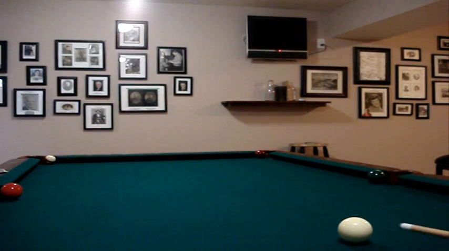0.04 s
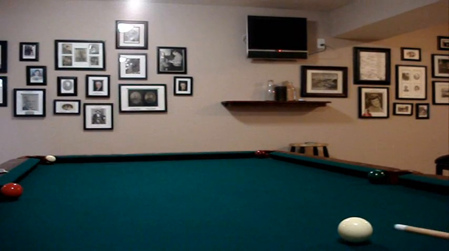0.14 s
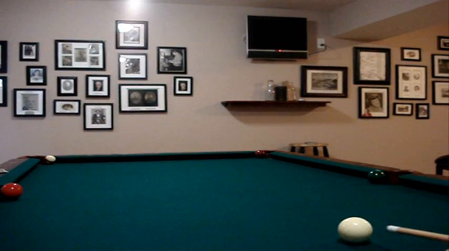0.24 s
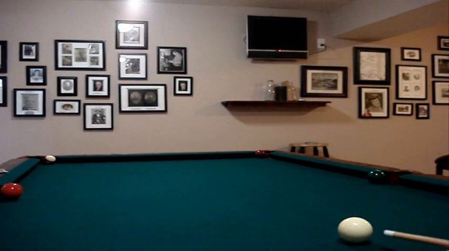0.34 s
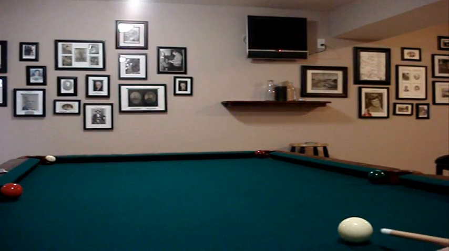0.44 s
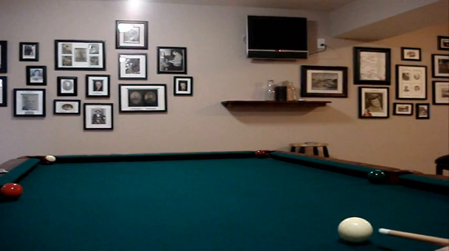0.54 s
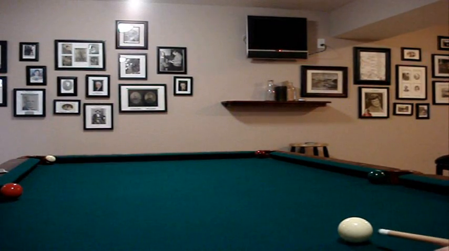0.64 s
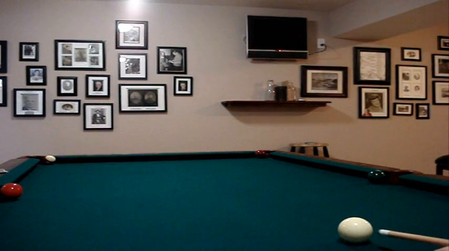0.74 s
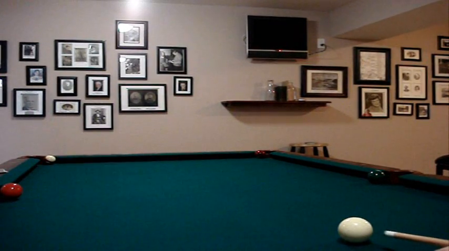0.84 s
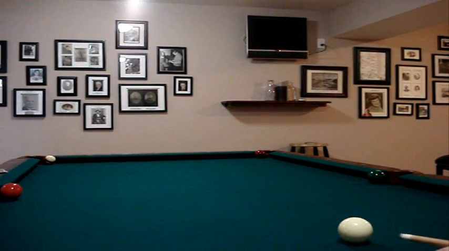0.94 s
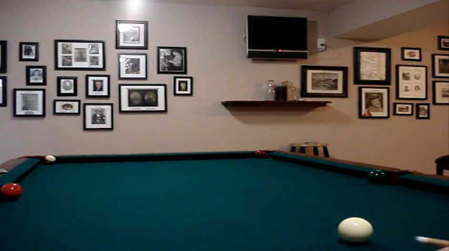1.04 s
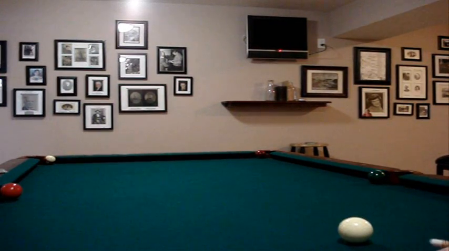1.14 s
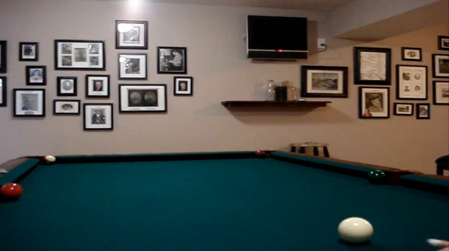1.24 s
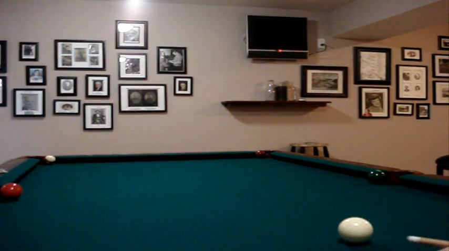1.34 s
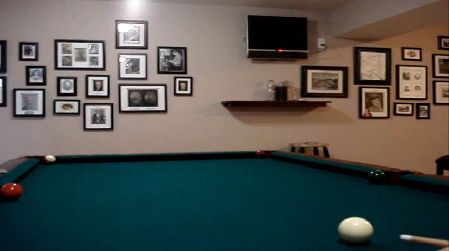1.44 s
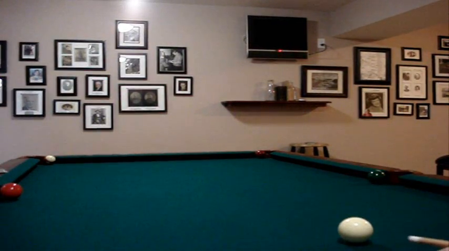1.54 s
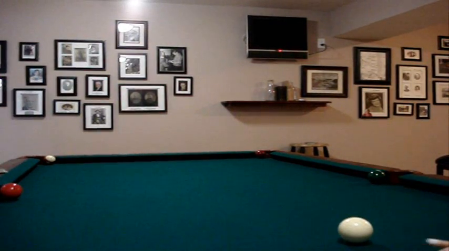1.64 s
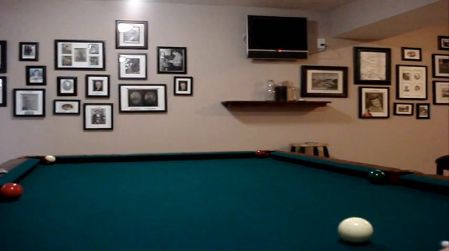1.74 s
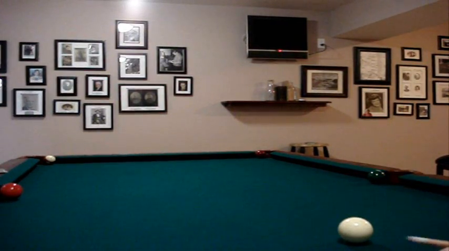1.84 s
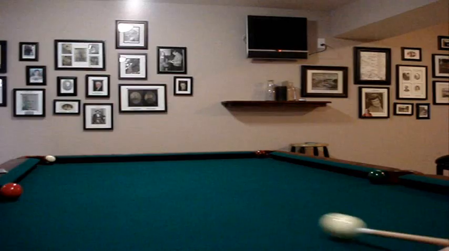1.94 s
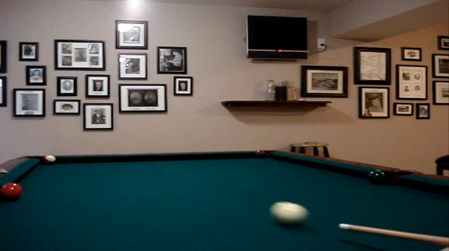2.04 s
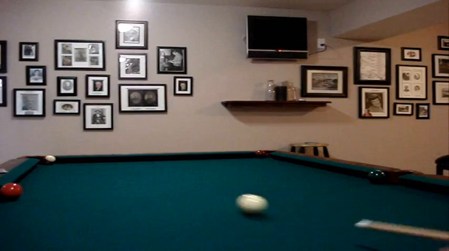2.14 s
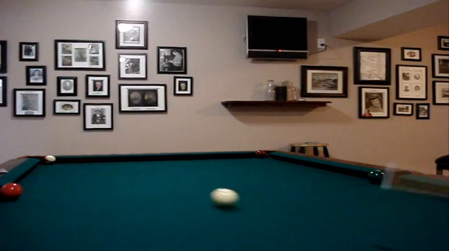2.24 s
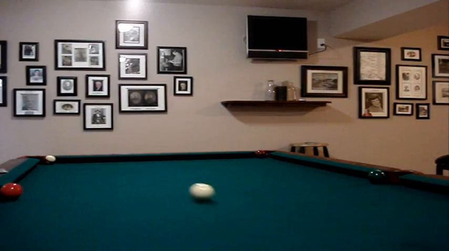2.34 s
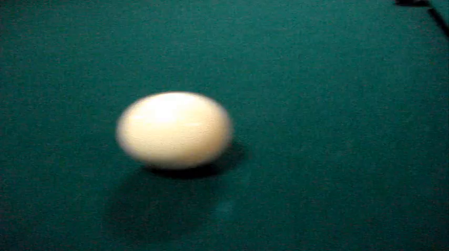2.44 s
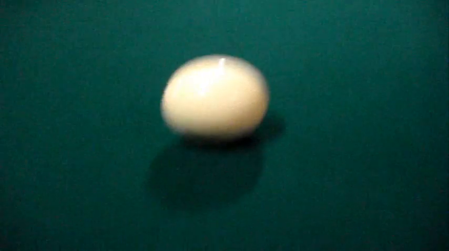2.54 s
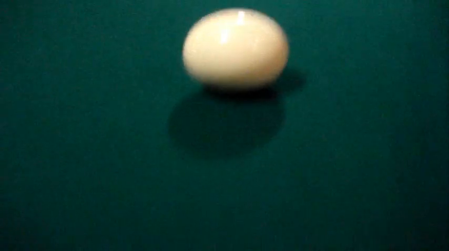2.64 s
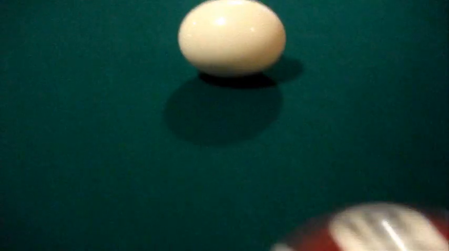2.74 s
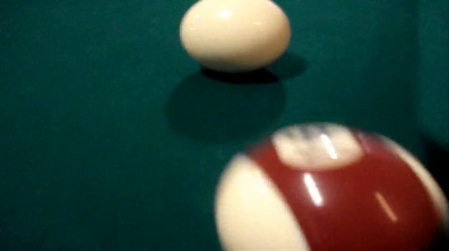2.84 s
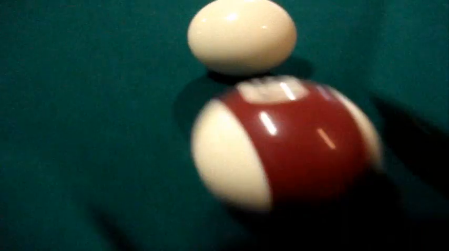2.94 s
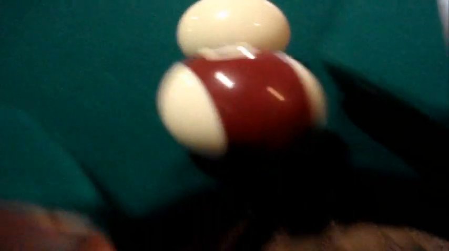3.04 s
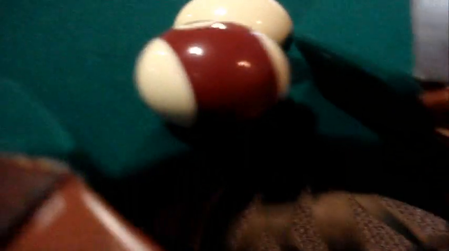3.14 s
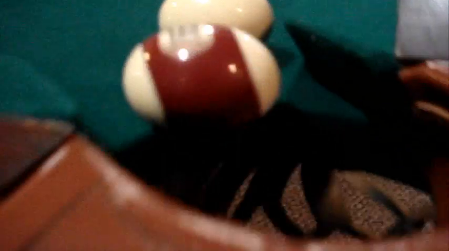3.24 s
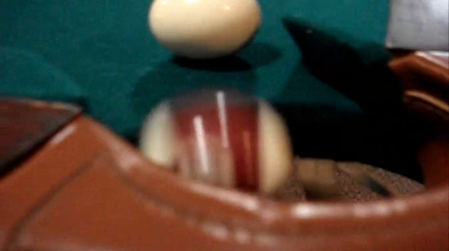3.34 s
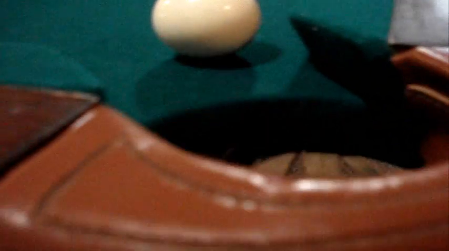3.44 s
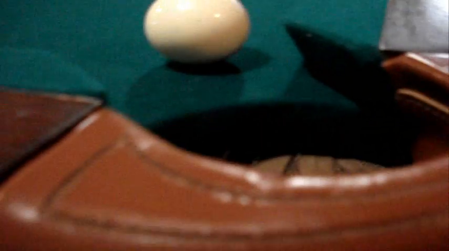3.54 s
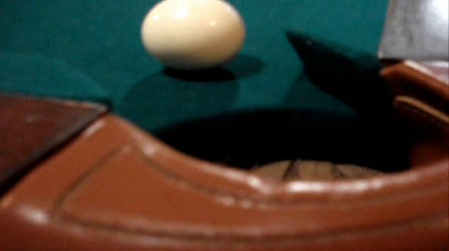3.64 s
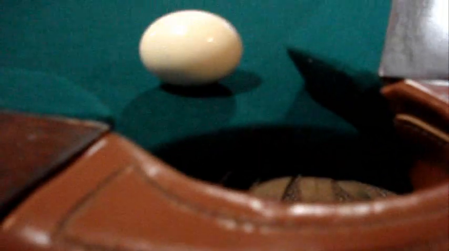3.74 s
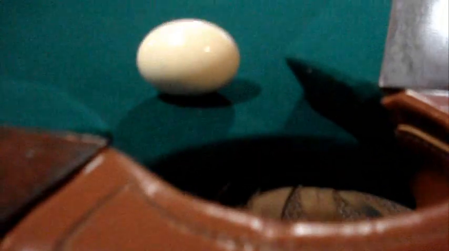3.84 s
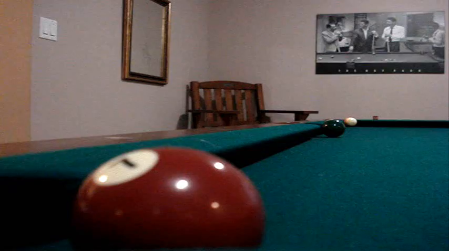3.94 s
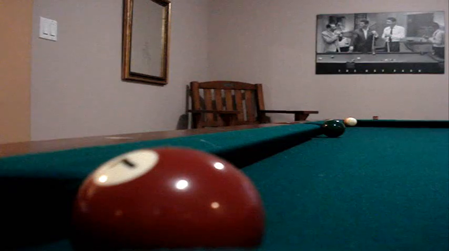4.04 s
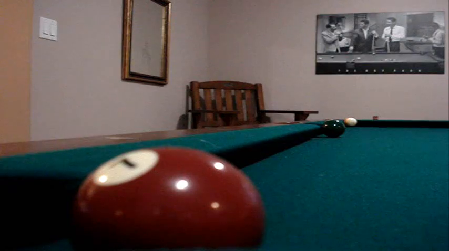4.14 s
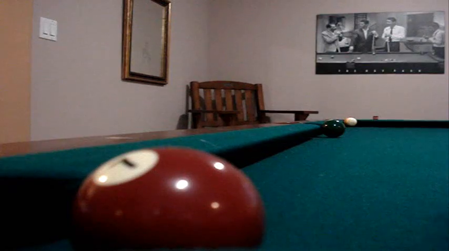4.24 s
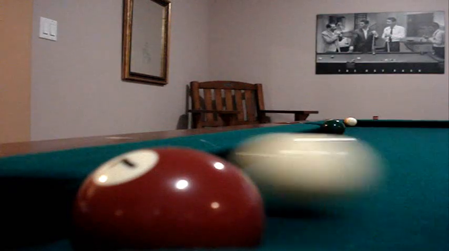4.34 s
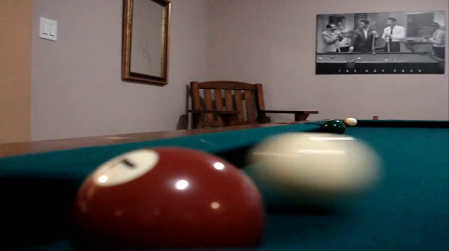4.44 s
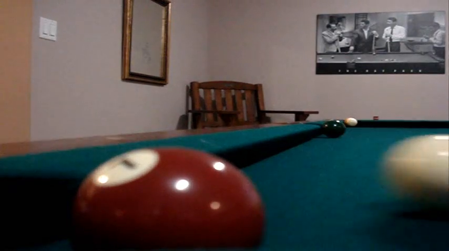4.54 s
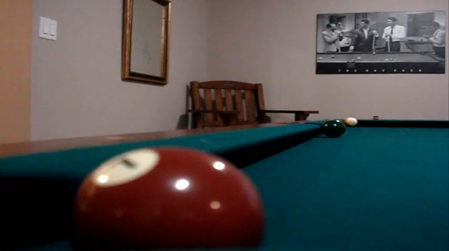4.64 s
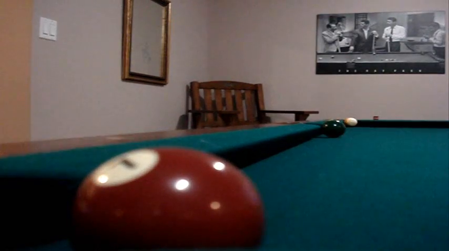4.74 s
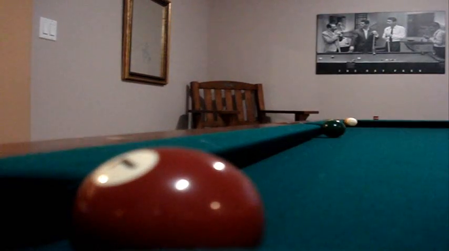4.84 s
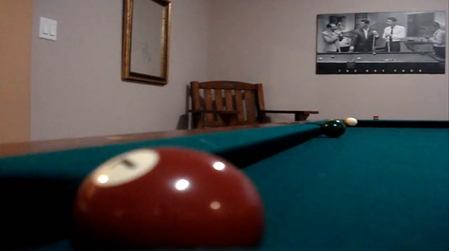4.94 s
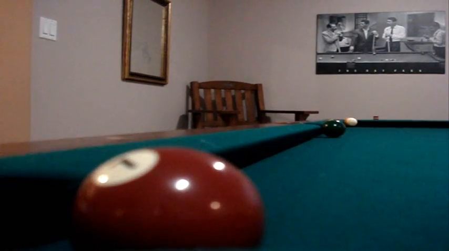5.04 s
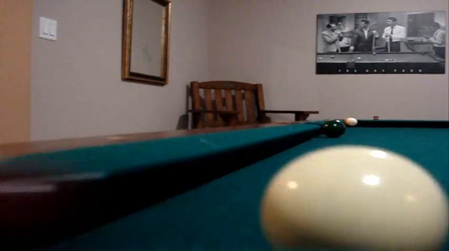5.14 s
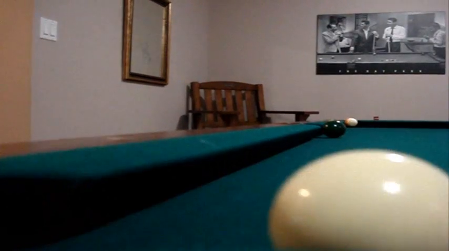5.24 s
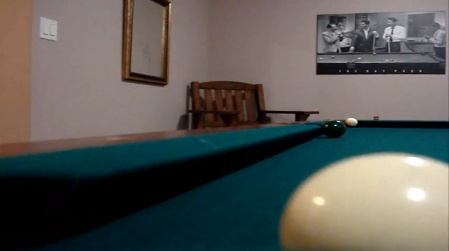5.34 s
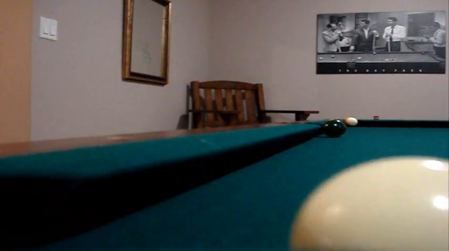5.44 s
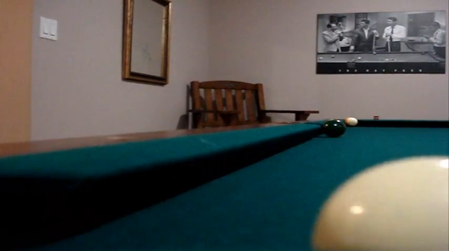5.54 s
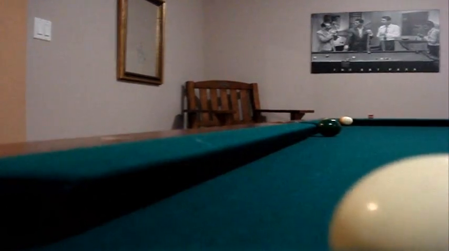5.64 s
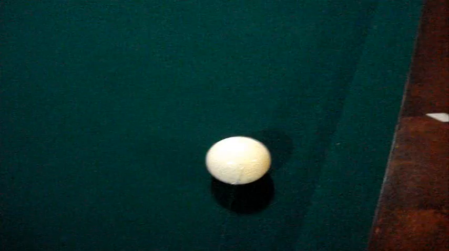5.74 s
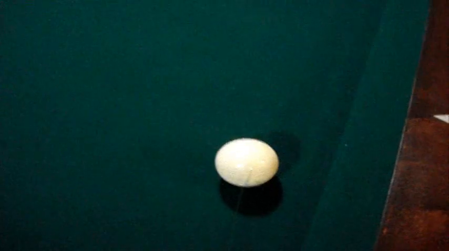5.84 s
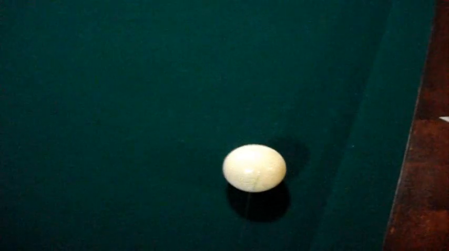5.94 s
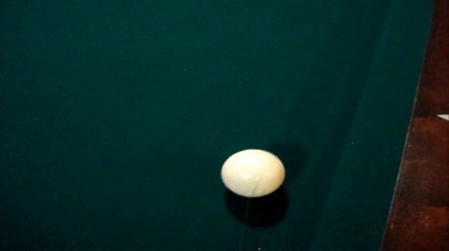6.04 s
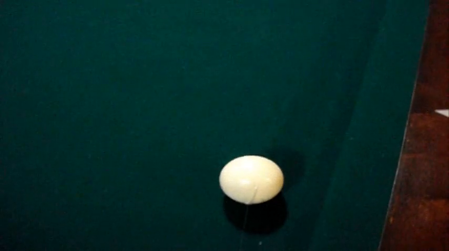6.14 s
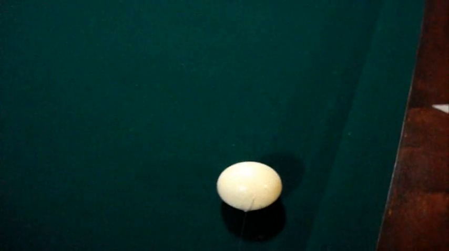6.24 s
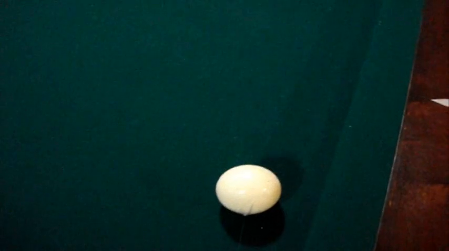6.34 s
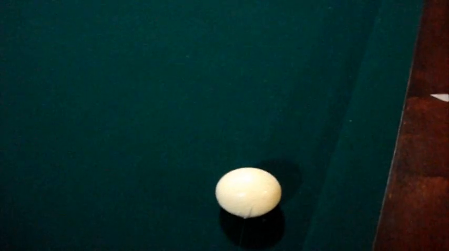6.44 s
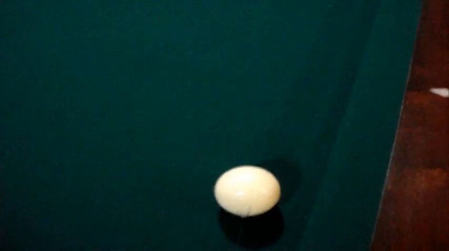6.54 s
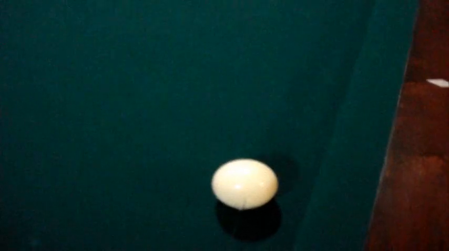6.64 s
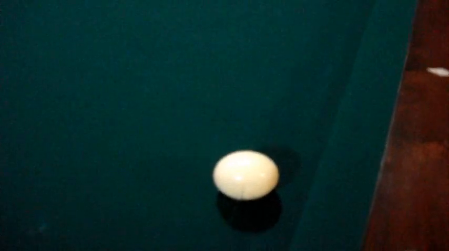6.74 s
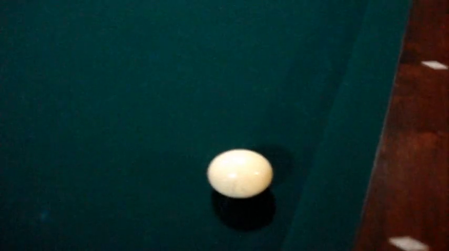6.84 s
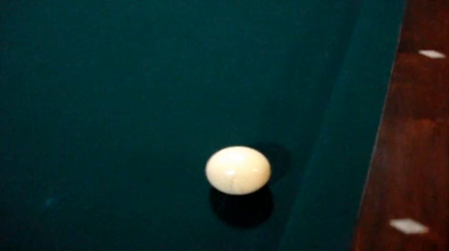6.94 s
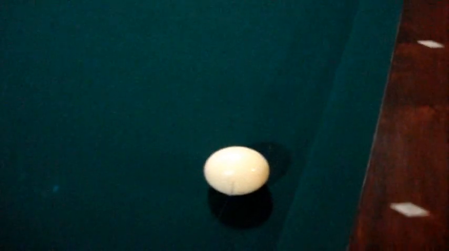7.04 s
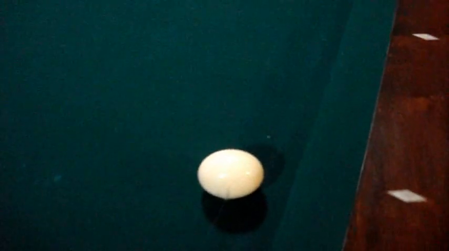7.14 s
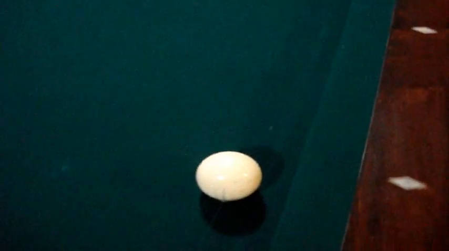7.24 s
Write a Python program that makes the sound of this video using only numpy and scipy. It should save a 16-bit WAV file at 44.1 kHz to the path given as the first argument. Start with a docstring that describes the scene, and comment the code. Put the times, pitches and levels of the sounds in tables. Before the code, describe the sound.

A cue strikes a pool ball, balls roll, clack and knock into a pocket, then break loudly in a small humming room.

```python
"""Pool table, close up

In a small, humming room a cue whispers over the hand and strikes the white ball. Balls roll, thud into
cushions, clack, chatter and knock in a pocket, each blow a brief force that sets a body ringing.
A hard break overloads the microphone, and the camera's case clicks and creaks as it is handled.
At last a spinning ball hisses on the cloth, its rub sinking in pitch as it slows."""
import sys
import numpy as np
from scipy import signal
from scipy.fft import rfft, irfft
from scipy.io import wavfile
from scipy.ndimage import uniform_filter1d, minimum_filter1d

SR = 44100
rng = np.random.default_rng(int(sys.argv[2]) if len(sys.argv) > 2 else 0)


def generate_wav(signal):
    """Clip the signal to [-1, 1] and save it as 16-bit WAV at the path in sys.argv[1]."""
    frames = np.transpose(np.atleast_2d(signal))
    scaled = np.clip(frames, -1, 1) * 32767
    pcm = np.round(scaled).astype(np.int16)
    wavfile.write(sys.argv[1], SR, pcm)


N = 321930
TIME = np.arange(N) / SR

# The colour of the room tone. Each row: frequency in Hz, level in dB.
AIR_COLOUR = [(20, -30), (40, -8.5), (75, -6.5), (110, -3), (170, -1.5), (300, 1), (600, -2.5), (1000, -6),
              (2000, -10), (4000, -14), (8000, -19.5), (9700, -23.5), (10500, -35.5), (15500, -32)]
# Mains hum. Each row: start in seconds, end in seconds, level in dB.
HUM_SPELLS = [(0, 2.6, -64.5), (2.5, 3.55, -57.5)]
# The cue slides over the bridge hand. Each row: start in seconds, end in seconds, level in dB.
PRACTICE_STROKES = [(.205, .22, -52.5), (1.39, 1.46, -60)]
# Cue tip on the white ball, and a ball in the pocket.
# Each row: start in seconds, level in dB, contact time in ms, room send in dB.
CUE_HITS = [(2.0485, -4.5, 0.727, 0.5)]
POCKET_HITS = [(3.5509, 3, 0.16, -3.5), (3.5827, -6.5, 0.26, 2.5), (3.7571, -29, 0.99, 9)]
# How cue, table, ball and pocket (hollow and rim) ring. Each row: pitch in Hz, width in Hz, gain in dB.
CUE_MODES = [(147, 17, 13), (211, 45, 13), (350, 160, 7.5), (520, 230, 7), (760, 88, 0), (960, 170, 0),
             (1760, 46, 9.5), (2220, 174, 16), (3140, 1900, 0), (5000, 6200, -7)]
TABLE_MODES = [(53.8, 22, -2.5), (168, 265, -0.5), (371, 110, -4), (498, 144, -1.5), (596, 10, -0.5),
               (790, 400, -3.5), (1190, 540, 7)]
BALL_MODES = [(252, 160, -11), (800, 200, -4.5), (1260, 630, -7.5), (1907, 870, 3), (2660, 3500, -17),
              (3600, 430, -20), (6000, 5400, -10)]
POCKET_MODES = [(740, 41, 9), (1620, 150, 13), (2960, 300, -4), (3480, 300, 11)]
# Early reflections off the table and the walls. Each row: delay in seconds, linear gain.
TABLE_REFLECTIONS = [(.0011, 0.19), (.0017, 0.27)]
WALL_REFLECTIONS = [(0.0126, 0.3), (0.0206, 0.16), (.0232, 0.2), (0.026, 0.053)]
# The length of the room's tail. Each row: frequency in Hz, time to fall 60 dB in seconds.
TAIL_DECAY = [(100, 0.67), (300, 0.33), (1000, 0.45), (2000, 0.34), (4000, 0.33), (12000, 0.13)]
# The colour of that tail. Each row: frequency in Hz, level in dB.
TAIL_COLOUR = [(40, -12), (150, -2), (500, -1), (1100, 2), (2000, -1.5), (3200, 2.5), (6000, -2),
               (15000, 6)]
# Balls roll over the slate. Each row: start in seconds, end in seconds, level in dB.
ROLL_SPELLS = [(2.08, 2.2, -47), (2.53, 2.6, -44.5), (3.3, 4.45, -55), (4.5, 5.2, -49.5)]
# The colour of their rumble. Each row: frequency in Hz, level in dB.
RUMBLE_COLOUR = [(50, -19), (100, 3), (160, 0.5), (300, -4.5), (600, -14), (1500, -19), (4000, -40)]
# Ball on cushion or slate, and ball on ball; the nearer the hit, the less room.
# Each row: start in seconds, level in dB, room send in dB.
CUSHION_HITS = [(2.0900, -30.5, 8), (4.5025, -24, 2), (4.5140, -24, 3), (5.2400, -12.5, 3.5),
                (5.2845, 1, 7.5), (5.3110, -8, 5), (5.3360, -8, 9.5), (5.3687, -10.5, 0.5)]
BALL_HITS = [(3.2686, 4, -6.5), (3.5426, 8, 5), (3.564, 9.5, -21), (3.6386, -2.5, -6.5),
             (5.042, -29.5, -12), (5.2367, 9, 8.5), (5.2868, 9, -4), (5.3117, 5, -11), (5.3686, -5, -15),
             (5.3874, 13, -10), (5.4069, 10, -13), (5.4334, -4.5, 0.5)]
# Handling clicks in the camera's case.
# Each row: start in seconds, level in dB, ring pitch in Hz, ring trim in dB, low bump trim in dB.
HANDLING_CLICKS = [(2.7703, -24, 2570, -18, -30), (3.86, -19, 2590, -5, -30), (3.8959, -12, 3430, -4, -3.5),
                   (3.9326, -8, 2310, 4, -9), (3.9698, -15.5, 2680, -6, -2), (4.1937, -33.5, 3660, 7, -30),
                   (5.696, -11.5, 2630, 0.5, -28), (5.6995, -14, 2610, 10, -22),
                   (5.7282, -25, 3420, -9, -28), (5.7759, -12, 2470, 2.5, -31),
                   (5.7905, -13.5, 2460, 1, -16), (5.8320, -17, 2400, 5, -28)]
# How the case rings. Each row: multiple of the ring pitch, width in Hz, gain in dB.
CASE_MODES = [(1, 125, 9.5), (1.35, 300, -17), (1.7, 370.4, -8)]
# The colour of its snap. Each row: frequency in Hz, level in dB.
SNAP_COLOUR = [(200, -14), (900, -1.5), (1600, 0.5), (3000, 4), (5000, -3), (8000, -6.5), (11000, -27.5),
               (15500, -14.5)]
# A quick, fading clatter of balls, at the pocket and in the break. Each row: start in seconds, length in
# seconds, opening level in dB, fade in dB per second, contact time at that level in ms, room send in dB.
BALL_FLURRIES = [(3.542, 0.062, 0, 135, 0.25, -4.5), (5.246, .22, 2, 94, .37, 1)]
# Two balls bounce against each other. Each row: start in seconds, first gap in seconds,
# final gap in seconds, opening level in dB, time to fall 10 dB in seconds.
CHATTER_RUNS = [(3.6838, .0152, 0.012, -9.5, 0.032), (3.748, .0052, .0025, -13.5, 0.041)]
# The case creaks between clicks. Each row: start in seconds, length in seconds, level in dB.
CASE_CREAKS = [(3.876, .026, -26), (5.739, .008, -26), (5.767, .018, -19), (5.798, .034, -41)]
# The colour of the spinning ball's hiss, with the recorder's faint treble fizz above 10 kHz.
# Each row: frequency in Hz, level in dB.
SPIN_HISS_COLOUR = [(1060, -18), (1800, -1), (2510, -4.5), (2720, -1.5), (3200, -3), (3570, -6), (4940, 1),
                    (5700, -10), (6180, -8.5), (8550, -27), (10700, -27), (11600, -27), (13400, -32),
                    (15500, -21)]
# The sample clock wobbles. Each row: rate in Hz, depth in samples.
CLOCK_JITTER = [(8000, 0.22), (12000, 0.44)]

CLACK_SOFTENING = 0.13  # contact time lengthens as this power of the falling force


def from_db(db):
    """Decibels to gain."""
    return 10 ** (np.asarray(db) / 20)


def rms_one(x):
    """Scale to rms 1."""
    return x / np.sqrt(np.mean(np.abs(x) ** 2) + 1e-20)


def at_hz(points, hz):
    """Read a table on a log-frequency axis."""
    f, value = np.transpose(points)
    return np.interp(np.log(np.maximum(hz, 1)), np.log(f), value)


def filtered(x, hz, kind="low", order=2):
    """A Butterworth filter."""
    return signal.sosfilt(signal.butter(order, hz, kind, fs=SR, output="sos"), x)


def noise(colour, size=N):
    """Noise of a given colour, rms 1."""
    gain = from_db(at_hz(colour, np.fft.rfftfreq(size, 1 / SR)))
    return rms_one(irfft(rfft(rng.standard_normal(size)) * gain, size))


def slow_noise(hz):
    """A random drift, rolled off above hz, rms 1."""
    return rms_one(filtered(rng.standard_normal(N), hz))


def add(out, s, sound):
    """Mix a sound in at s seconds."""
    i = int(round(s * SR))
    out[i:i + len(sound)] += sound[:len(out) - i]


def spells(rows, attack_s, release_s):
    """The envelope of sounds that fade in, hold and die away."""
    envelope = 0
    for start, end, db in rows:
        attack = np.clip((TIME - start) / attack_s, 0, 1)
        release = np.exp(-np.maximum(TIME - end, 0) / release_s)
        envelope += from_db(db) * attack * release
    return envelope


def scattered(length_s, per_s, spread_db, count=64):
    """Unevenly spaced moments, each with a random level offset in dB."""
    moments = (np.arange(count) + rng.uniform(0, .8, count)) / per_s
    offsets_db = spread_db * rng.standard_normal(count)
    return [(s, db) for s, db in zip(moments, offsets_db) if s < length_s]


def resonate(x, modes):
    """Ring a bank of parallel resonators."""
    out = 0
    for hz, width, db in modes:
        r = np.exp(-np.pi * width / SR)
        poles = [1, -2 * r * np.cos(2 * np.pi * hz / SR), r * r]
        out += from_db(db) * (1 - r * r) / 2 * signal.lfilter([1, 0, -1], poles, x)
    return out


def blow(contact_ms, modes, smoothing=2.04, size=4400):
    """An elastic contact: force swells and falls, and its rate of change rings the body; peak 1."""
    contact_s = contact_ms / 1000
    phase = np.minimum(np.arange(size) / (SR * contact_s), 1)
    force = np.abs(np.sin(np.pi * phase)) ** 1.5
    force = filtered(force, min(smoothing / contact_s, SR / 3))  # losses round its corners
    sound = resonate(np.diff(force, prepend=0), modes)
    return sound / np.abs(sound).max()


def blows(rows, modes):
    """Blows on one body, as two buses: the direct sound and the room send."""
    direct, send = np.zeros(N), np.zeros(N)
    for s, db, contact_ms, send_db in rows:
        sound = from_db(db) * blow(contact_ms, modes)
        add(direct, s, sound)
        add(send, s, from_db(send_db) * sound)
    return np.array([direct, send])


def elastic(rows, full_ms, softening):
    """Add contact times: full_ms for a blow reaching the room at 0 dB, longer and duller if weaker."""
    return [(s, db, full_ms * from_db(-softening * (db + send_db)), send_db) for s, db, send_db in rows]


def room_tone(air_db=-50.5, hum_hz=124):
    """A bed of steady air, with mains hum under the first half."""
    hum = rms_one(np.sin(2 * np.pi * hum_hz * TIME))
    return from_db(air_db) * noise(AIR_COLOUR) + spells(HUM_SPELLS, attack_s=0.19, release_s=.15) * hum


def cue_slides(centre_hz=5500, width_hz=3500):
    """The shaft whispers over the hand during the practice strokes."""
    rustle = rms_one(resonate(noise(AIR_COLOUR), [(centre_hz, width_hz, 0)]))
    return spells(PRACTICE_STROKES, attack_s=0.011, release_s=0.011) * rustle


def cue_strike():
    """The tip meets the white ball and the cue rings."""
    return blows(CUE_HITS, CUE_MODES)


def echoes(x, paths):
    """Delayed copies off hard surfaces."""
    out = np.zeros(N)
    for delay_s, gain in paths:
        add(out, delay_s, gain * x)
    return out


def room(send, build_s=0.00033, tail_db=-1.0, size=32768):
    """A few wall echoes and a diffuse tail that dies sooner in the treble."""
    t, hz = np.arange(size) / SR, np.fft.rfftfreq(size, 1 / SR)
    white, tail = rfft(rng.standard_normal(size)), 0
    build = 1 - np.exp(-t / build_s)
    edges_hz = np.geomspace(30, 18000, 20)
    for low, high in zip(edges_hz, edges_hz[1:]):
        centre = np.sqrt(low * high)
        decay = from_db(-60 * t / at_hz(TAIL_DECAY, centre))
        band = irfft(white * (hz >= low) * (hz < high)) * decay * build
        share = np.sqrt(2 * (high - low) / SR / size)  # energy in proportion to the band's width
        tail += share * from_db(at_hz(TAIL_COLOUR, centre)) * rms_one(band)
    return from_db(tail_db) * signal.fftconvolve(send, tail)[:N] + echoes(send, WALL_REFLECTIONS)


def rolling(lumps_db=1.5, lumps_hz=14):
    """Rolling balls make the slate rumble unevenly."""
    lumps = from_db(lumps_db * slow_noise(lumps_hz))
    return spells(ROLL_SPELLS, attack_s=0.066, release_s=0.066) * lumps * noise(RUMBLE_COLOUR)


def thuds():
    """A ball meets cushion or slate, and the table answers with a dull knock."""
    return blows(elastic(CUSHION_HITS, full_ms=1.17, softening=0.33), TABLE_MODES)


def case_clicks(rows, snap_s=0.0033, ring_db=-3.5, bump_hz=26, bump_s=0.012, damped_s=0.022, size=4096):
    """Dry snaps that ring briefly in the plastic and shove the microphone."""
    out, t = np.zeros(N), np.arange(size) / SR
    bump = np.cos(2 * np.pi * bump_hz * t) * np.exp(-t / bump_s) / 2
    damping = np.exp(-(t / damped_s) ** 2)  # the hand stops the ringing
    for s, db, ring_hz, ring_trim_db, bump_trim_db in rows:
        snap = noise(SNAP_COLOUR, size) * np.exp(-t / snap_s) / 2
        modes = [(ratio * ring_hz, width, gain_db) for ratio, width, gain_db in CASE_MODES]
        ring = resonate(signal.unit_impulse(size), modes)
        ring = from_db(ring_db + ring_trim_db) * ring / np.abs(ring).max()
        add(out, s, from_db(db) * (damping * (snap + ring) + from_db(bump_trim_db) * bump))
    return out


def clacks(shove_db=-19, shove_ms=2.23, shove_send_db=-12.5):
    """Ball strikes ball with a bright crack, and a softer shove into the table adds body."""
    cracks = elastic(BALL_HITS, full_ms=.42, softening=CLACK_SOFTENING)
    shoves = [(s, db + shove_db, shove_ms, shove_send_db) for s, db, _ in BALL_HITS]
    return blows(cracks, BALL_MODES) + blows(shoves, TABLE_MODES)


def flurries():
    """A quick clatter of balls: random knocks that grow weaker and duller."""
    hits = []
    for start, length_s, level_db, fade_db_per_s, contact_ms, send_db in BALL_FLURRIES:
        for since, offset_db in scattered(length_s, per_s=150, spread_db=2):
            change_db = offset_db - fade_db_per_s * since
            softened_ms = contact_ms * from_db(-CLACK_SOFTENING * change_db)
            hits.append((start + since, level_db + change_db, softened_ms, send_db))
    return blows(hits, BALL_MODES)


def pocket_knocks():
    """A ball knocks about in the pocket, ringing its hollow and its rim."""
    return blows(POCKET_HITS, POCKET_MODES)


def chatter(shrink=0.458, contact_ms=0.66, send_db=-6, count=20):
    """Two balls pressed together bounce ever faster until they buzz and come to rest."""
    hits = []
    for start, first_gap, final_gap, level_db, fade_s in CHATTER_RUNS:
        gaps = final_gap + (first_gap - final_gap) * shrink ** np.arange(count)
        gaps *= 1 + np.linspace(0, .2, count) * rng.uniform(-1, 1, count)  # weak bounces grow uneven
        since = np.cumsum(gaps) - gaps
        levels_db = level_db - 10 * (since / fade_s) ** 2
        hits += [(start + s, db, contact_ms, send_db) for s, db in zip(since, levels_db)]
    return blows(hits, BALL_MODES)


def creak_ticks(ring_hz=2660, ring_trim_db=-0.5, bump_trim_db=-25):
    """Rows of faint case clicks that come at random while the grip shifts."""
    return [(start + since, db + offset_db, ring_hz, ring_trim_db, bump_trim_db)
            for start, length_s, db in CASE_CREAKS
            for since, offset_db in scattered(length_s, per_s=110, spread_db=3)]


def spin_rub(age, start_hz=1736, rest_hz=947, slowing_s=0.92, core_hz=66, skirt_hz=199, widen_s=0.21):
    """The ball rubs over the weave: a narrow rush that sinks and broadens as the spin runs down."""
    pitch_hz = rest_hz + (start_hz - rest_hz) * np.exp(-age / slowing_s)
    skirt_share = 0.61 * (1 - np.exp(-age / widen_s))
    core, skirt = [slow_noise(hz) + 1j * slow_noise(hz) for hz in (core_hz, skirt_hz)]
    weave = np.sqrt(1 - skirt_share) * core + np.sqrt(skirt_share) * skirt
    rub = np.real(weave * np.exp(2j * np.pi * np.cumsum(pitch_hz) / SR))
    return rms_one(filtered(rub, 810, "high", order=4))  # a small ball radiates little bass


def spinning_ball(start_s=6.0, bite_s=6.088, rise_db_per_s=328, hiss_attack_s=0.28,
                  nearest_s=6.624, pass_width_s=0.17):
    """The rub grows until the ball bites, and a hiss fades in; both swell as the ball comes nearest."""
    age = np.maximum(TIME - start_s, 0)
    rub = from_db(-35.5 - rise_db_per_s * np.maximum(bite_s - TIME, 0)) * spin_rub(age)
    hiss = from_db(-38) * np.minimum(age / hiss_attack_s, 1) * noise(SPIN_HISS_COLOUR)
    swell_db = 4.5 * np.exp(-((TIME - nearest_s) / pass_width_s) ** 2)
    flutter_db = 0.82 * slow_noise(hz=40)
    return from_db(swell_db + flutter_db) * (rub + hiss)


def scene():
    """The mono mix: hits with their echoes, the cloth, the camera and the quiet bed."""
    direct, send = chatter() + cue_strike() + thuds() + clacks() + flurries() + pocket_knocks()
    hits = direct + echoes(direct, TABLE_REFLECTIONS) + room(send)
    cloth = spinning_ball() + rolling()
    bed = room_tone() + cue_slides()
    camera = case_clicks(HANDLING_CLICKS + creak_ticks())
    return (hits + cloth + camera + bed)[None]


def limiter(x, ceiling_db, release_db_per_s, size=15):
    """The gain ducks just ahead of a peak and soon comes back."""
    over_db = np.maximum(20 * np.log10(np.abs(x) + 1e-9) - ceiling_db, 0)
    ramp = release_db_per_s * TIME
    duck_db = np.maximum.accumulate(over_db + ramp, axis=-1) - ramp
    return x * from_db(uniform_filter1d(minimum_filter1d(-duck_db, size), size))


def overload(x, sag_db, sag_hz):
    """Loud bursts push the microphone's bias down, which thumps, and the peaks clip."""
    sag = filtered(x * x, [20, sag_hz], "band")
    return np.clip(x - from_db(sag_db) * sag, -.95, .78)


def record(dry):
    """Peaks are limited and clipped, clock wobble mirrors the mids into the treble, the top is cut."""
    limited = limiter(dry, ceiling_db=1.65, release_db_per_s=512)
    clipped = overload(limited, sag_db=-9.5, sag_hz=84)
    wobble = sum(depth * np.cos(2 * np.pi * hz * TIME) for hz, depth in CLOCK_JITTER)
    jittered = clipped + wobble * np.gradient(clipped, axis=-1)
    high_cut = signal.ellip(10, .2, 70, 15600, fs=SR, output="sos")
    return signal.sosfilt(high_cut, jittered)


dry = scene()
out = record(dry)
generate_wav(out)
```